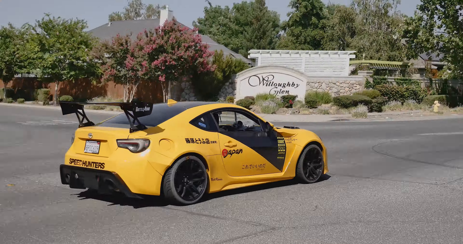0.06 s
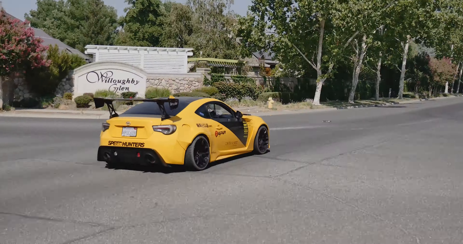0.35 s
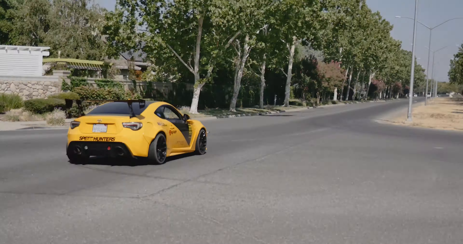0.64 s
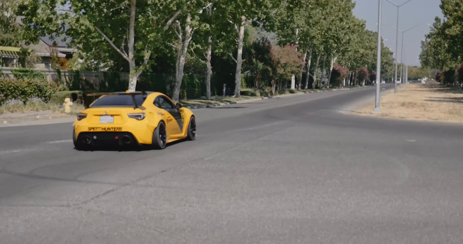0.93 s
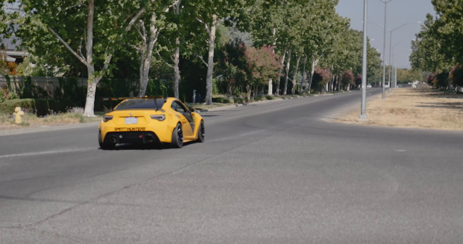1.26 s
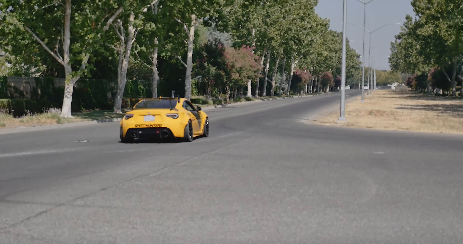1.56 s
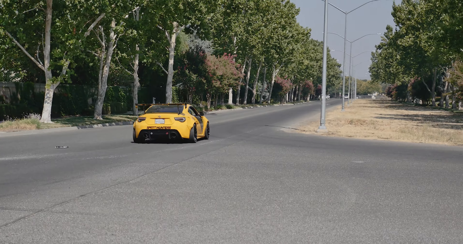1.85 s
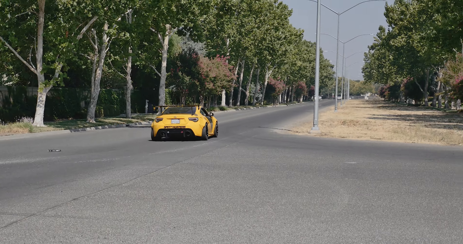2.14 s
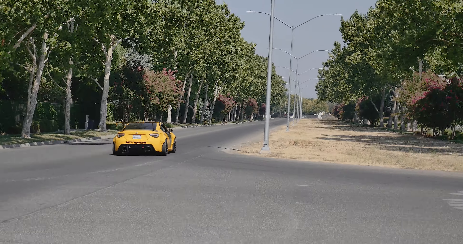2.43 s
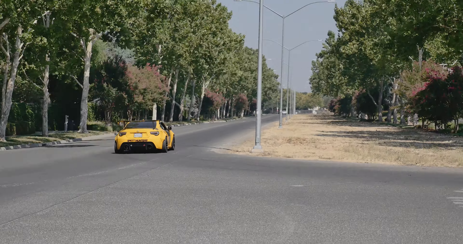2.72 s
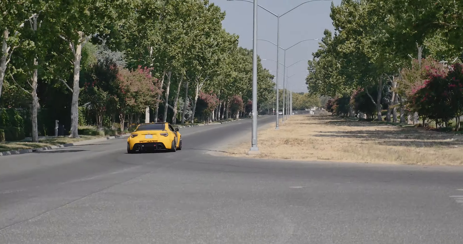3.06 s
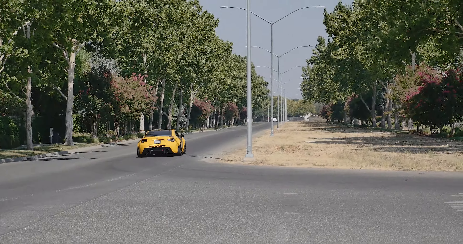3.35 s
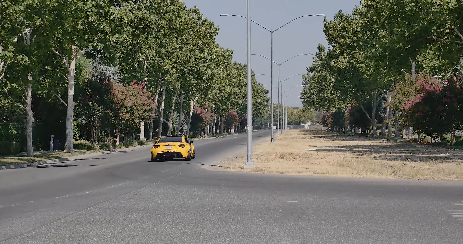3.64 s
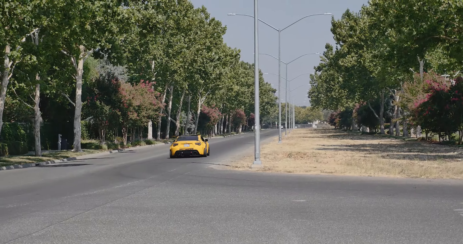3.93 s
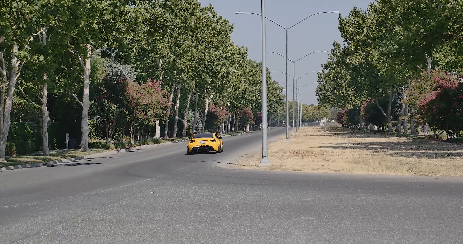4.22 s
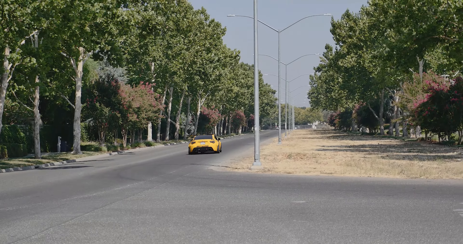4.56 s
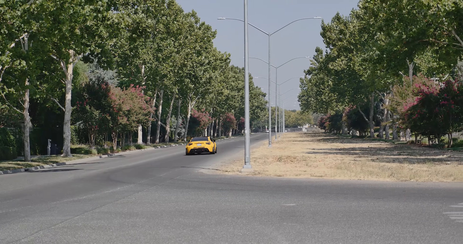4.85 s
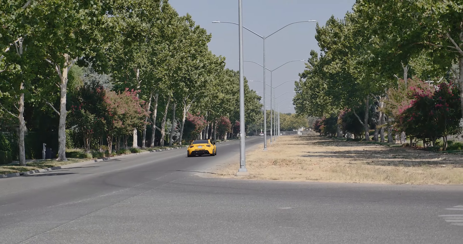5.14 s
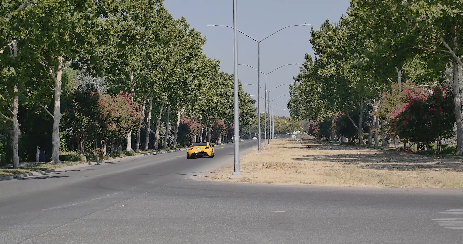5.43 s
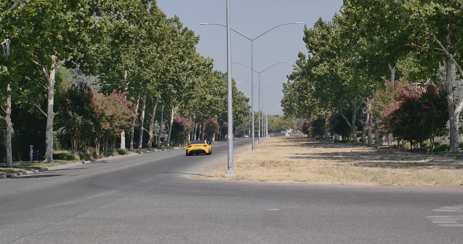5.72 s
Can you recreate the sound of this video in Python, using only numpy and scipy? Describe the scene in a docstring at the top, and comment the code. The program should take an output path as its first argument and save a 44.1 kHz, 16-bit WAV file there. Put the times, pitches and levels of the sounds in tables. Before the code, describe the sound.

A sports car burbles with sharp exhaust bangs, accelerates away with a rising rasp, then lifts off and pops again farther away.

```python
"""Flat-four sports car driving away

A tuned engine recedes down a tree-lined road, its tailpipes facing the listener. Unequal headers space
the exhaust pulses unevenly, so it coasts with a lumpy burble while unburnt fuel bangs in the hot pipe.
It pulls hard for two seconds with a turbulent rasp, lifts off and pops again farther away. The tyres
roll, the street echoes, and the loud low notes and the bangs overload a limiter."""
import sys
import numpy as np
from scipy import signal
from scipy.fft import rfft, irfft
from scipy.io import wavfile
from scipy.ndimage import uniform_filter1d

SR = 44100
rng = np.random.default_rng(int(sys.argv[2]) if len(sys.argv) > 2 else 0)


def generate_wav(signal):
    """Clip the signal to [-1, 1] and save it as 16-bit WAV at the path in sys.argv[1]."""
    frames = np.transpose(np.atleast_2d(signal))
    scaled = np.clip(frames, -1, 1) * 32767
    pcm = np.round(scaled).astype(np.int16)
    wavfile.write(sys.argv[1], SR, pcm)


N = 259308
TIME = np.arange(N) / SR

# spectrum of tyres on asphalt and open air: f/Hz, level/dB
TYRE_SPECTRUM = [(25, -3.5), (60, 12), (150, 10), (350, 5), (700, -8.5), (1050, -4), (1600, -11),
                 (2500, -24), (3300, -29), (4500, -31.5), (6000, -48), (9000, -52.5), (16000, -65.5)]
# reverberation time of the street: f/Hz, T60/s
STREET_DECAY = [(100, 0.68), (600, 0.61), (1700, 0.32), (5000, 0.075), (14000, 0.24)]
# afterfire: t/s, thump level/dB, crack level/dB, pipe ring f/Hz
BANGS = [(0.054, -1.5, -2, 590), (.426, 5, 3.5, 456), (0.4336, 2.5, -8.5, 580), (0.4793, -3, -29, 537),
         (.508, -9, -22.5, 566), (0.5587, -6, -12, 438), (.569, 3, 2.5, 629), (.589, -6, -14.5, 567),
         (.926, 0.5, -12, 694), (0.9804, -5, -9, 711), (1.1, -20.5, -38, 720), (1.329, -13, -10, 254.5),
         (1.3445, -9, 1, 830), (1.443, -20, -30.5, 255), (2.112, -19, -49, 540), (2.151, -26, -47, 538),
         (2.38, -19.5, -52, 590), (4.62, -24.5, -48, 576), (4.6508, -9.5, -44, 248), (4.701, -21, -58, 580),
         (5.141, -21.5, -50.5, 666), (5.157, -14.5, -41, 399), (5.205, -20.5, -46, 644),
         (5.711, -5.5, -19.5, 503), (5.781, -12.5, -22.5, 553)]
# spectra of a bang leaving the pipe and of its crack: f/Hz, level/dB
THUMP_SPECTRUM = [(30, -25.5), (70, 6), (130, 13), (250, 7), (450, 0), (700, 2.5), (1000, -29.5),
                  (1600, -22.5), (3000, -74.5), (8000, -67.5)]
CRACK_SPECTRUM = [(200, 8.5), (700, 13.5), (1250, 4), (1850, 2), (2300, -2.5), (2800, -6.5), (3400, -10),
                  (4700, -6), (6300, -17), (8000, -16), (11000, -30), (16000, -36)]
# modes of the pipe ring: frequency ratio, level/dB
RING_MODES = [(0.761, -21), (1, -1.5), (1.4, -20), (2.2, -22), (3.2, -28.5)]
# firing rate before the driveline shudder is added: t/s, f/Hz
FIRING_RATE = [(0, 120.6), (.15, 115), (.4, 113.8), (1, 107.5), (1.5, 104.2), (2.33, 97.22), (2.62, 104.4),
               (3.05, 113.7), (3.6, 125.6), (3.9, 131.7), (4.12, 138), (4.5, 135.6), (4.9, 136.5),
               (5.45, 131), (5.88, 124.1)]
# pedal presses: pressed t/s, lifted t/s, throttle (0-1), boom level/dB, bark level/dB
PRESSES = [(-.3, 0.389, 0.03, -11, -23), (2.356, 4.193, 0.88, -12.5, -22)]
# the pipe's low boom and the bark above it while coasting: t/s, boom level/dB, bark level/dB
COASTING_LEVELS = [(.5, -12.5, -35), (.64, -16.5, -45), (.78, -11.5, -30), (1.46, -14.5, -53.5),
                   (1.56, -19, -56), (1.68, -15, -38), (1.85, -19.5, -45), (2.04, -13, -33.5),
                   (2.26, -14.5, -35), (2.32, -20.5, -44), (4.4, -24, -40), (4.56, -18, -34),
                   (4.9, -24, -37.5), (5.06, -20.5, -35.5), (5.13, -17.5, -24), (5.24, -20, -34),
                   (5.5, -19, -30.5), (5.88, -19, -34.5)]
# unequal headers, in firing order: delay/firing intervals, level/dB with throttle shut; the same, open
HEADERS = [(0.11, 7, -0.0433, 5), (-0.053, 6, -0.071, -1), (-0.14, 5, 0.15, 0.5), (.1, 3.5, .07, 0.1)]
# spectrum of the turbulent jet at the tailpipe: f/Hz, level/dB
JET_SPECTRUM = [(300, -12), (700, -11.5), (1100, -1.5), (1650, 6), (2500, -5.5), (3300, -9), (4600, -10),
                (6000, -19), (9000, -27.5), (12000, -36), (16000, -39)]
# spectra of one firing, throttle shut and open: f/Hz, level/dB
SHUT_SPECTRUM = [(25, -36), (55, -16.5), (80, -3), (108, 3), (135, 0.5), (165, -1), (205, -12.5), (250, -9),
                 (320, -19), (430, -22.5), (560, -14.5), (700, -25.5), (850, -39), (2000, -86)]
OPEN_SPECTRUM = [(25, -15.5), (60, -7.5), (90, -1), (120, 6), (170, 2), (240, 1), (310, -2), (390, -3.5),
                 (460, -6.5), (540, 0.5), (700, -0.5), (830, -21.5), (1030, -30), (1700, -23), (3500, -53)]
# limiter characteristic: recent level/dB, ceiling/dB
LIMITER_CURVE = [(-17, -2), (-14.6, -5.5), (-12.6, -8.8)]

START_M, SPEED_M_PER_S = 4, 7.5
LOW_REVS_HZ = 100  # reference firing rate for lope, rasp and rush


def amp(db):
    """Amplitude ratio of a level in decibels."""
    return 10 ** (np.asarray(db) / 20)


def curves(rows):
    """Linear interpolation of each column of a timed table at every sample."""
    s, *columns = np.transpose(rows)
    return [np.interp(TIME, s, column) for column in columns]


def read(spectrum, hz):
    """Interpolation of a table on a logarithmic frequency axis."""
    f, value = np.transpose(spectrum)
    return np.interp(np.log(hz + 1), np.log(f), value)


def add(mix, s, sound):
    """Superposition of a sound starting at time s."""
    part = mix[max(round(s * SR), 0):][:len(sound)]
    part += sound[:len(part)]


def colour(x, spectrum, size=8192):
    """Minimum-phase filter with the given spectrum, rolling off beyond its ends."""
    hz = abs(np.fft.fftfreq(size, 1 / SR)) + 1
    rolloff = np.minimum(hz / spectrum[0][0], 1) * np.minimum(spectrum[-1][0] / hz, 1) ** 2
    log_gain = np.log(amp(read(spectrum, hz)) * rolloff)
    response = np.fft.ifft(np.exp(np.conj(signal.hilbert(log_gain)))).real[:size // 2]
    return signal.oaconvolve(x, response)[:len(x)]


def band(x, lo_hz, hi_hz):
    """Zero-phase band-pass filter."""
    hz = np.fft.rfftfreq(N, 1 / SR) + 1e-3
    return irfft(rfft(x) / (1 + (lo_hz / hz) ** 12) / (1 + (hz / hi_hz) ** 12), N)


def rms(x, size=3000):
    """Running root mean square over a few engine cycles."""
    return np.sqrt(abs(uniform_filter1d(uniform_filter1d(x ** 2, size), size)) + 1e-14)


def impulses(s, strength):
    """Fractional delay: each impulse is shared between two neighbouring samples."""
    whole, part = np.divmod(np.clip(s * SR, 0, N - 2), 1)
    whole = whole.astype(int)
    return np.bincount(whole, strength * (1 - part), N) + np.bincount(whole + 1, strength * part, N)


def distance(s):
    """Uniform motion: metres from car to listener at time s."""
    return START_M + SPEED_M_PER_S * s


def distance_db(db_per_doubling):
    """Power law of distance: the level changes by an equal step with each doubling."""
    return db_per_doubling * np.log2(distance(TIME) / START_M)


def tyres(near_db=-31.5):
    """Rolling noise: a broad spectrum attenuated with distance."""
    roll = colour(rng.standard_normal(N), TYRE_SPECTRUM)
    return amp(near_db + distance_db(-1.5)) * roll / roll.std()


def street_reverb(x, rise_s=0.16):
    """Diffuse reflection from trees and walls; the treble decays first."""
    hz, t, noise = signal.stft(rng.standard_normal(SR // 2), SR, nperseg=256)
    decay = amp(-60 * t / read(STREET_DECAY, hz)[:, None])
    tail = signal.istft(noise * decay * (1 - np.exp(-t / rise_s)), SR, nperseg=256)[1]
    wet = signal.oaconvolve(band(x, 230, 16000), tail / np.linalg.norm(tail))[:N]
    return wet * amp(np.interp(TIME, [1.5, 5.5], [-28, -20]))


def roadside_echo(x, delay_s=0.017, smear_s=0.0015, size=1500):
    """Scattering at the roadside: a ragged echo gains on the direct sound as the car recedes."""
    scatter = rng.standard_normal(size) * np.exp(-np.arange(size) / (smear_s * SR))
    echo = np.zeros(N)
    add(echo, delay_s, signal.oaconvolve(band(x, 550, 9000), scatter / np.linalg.norm(scatter)))
    return echo * amp(np.interp(TIME, [1.5, 5.5], [-22, -2]))


def open_end(x, turn_hz=110):
    """Phase inversion of the lowest notes at the pipe mouth: suction follows each pressure spike."""
    pole = np.exp(-2 * np.pi * turn_hz / SR)
    return signal.lfilter([pole, -1], [1, -pole], x)


def afterfire(crack_s=0.0012, sizzle_s=0.0098, sizzle_db=-18, tip_hz=4600, tip_s=0.00049, size=6000):
    """Impulsive excitation: fuel explodes in the hot pipe with a thump, a hollow ring and a crack."""
    t = np.arange(size) / SR
    thump = open_end(colour(signal.unit_impulse(size), THUMP_SPECTRUM))
    thump /= abs(thump).max()
    bangs = np.zeros(N)
    for s, thump_db, crack_db, ring_hz in BANGS:
        ring_s = 0.0039 + 0.00009 * distance(s)  # the ring is drawn out with distance
        modes = sum(amp(db) * np.sin(2 * np.pi * ring_hz * ratio * t) for ratio, db in RING_MODES)
        ring = np.exp(-t / ring_s) * modes
        flame = np.exp(-t / crack_s) + amp(sizzle_db) * np.exp(-t / sizzle_s)
        crack = colour(flame * rng.standard_normal(size), CRACK_SPECTRUM)
        # the steepest shock fronts also ring across the mouth of the tailpipe
        crack += amp(crack_db) * np.exp(-t / tip_s) * np.sin(2 * np.pi * tip_hz * t)
        add(bangs, s, amp(thump_db) * (thump + ring) + amp(crack_db) * crack)
    return bangs


def pedal(pressed_s, lifted_s, attack_s=0.068, release_s=0.16):
    """Trapezoidal envelope of one press of the pedal."""
    return np.interp(TIME, [pressed_s, pressed_s + attack_s, lifted_s, lifted_s + release_s], [0, 1, 1, 0])


def shudder(hz=3.5, decay_s=0.3, lag_s=0.019):
    """Damped oscillation of the driveline, wound up by each press in proportion to the throttle."""
    swing = np.zeros(N)
    for pressed_s, _, opening, *_ in PRESSES:
        t = np.maximum(TIME - pressed_s - lag_s, 0)
        swing += opening * np.exp(-t / decay_s) * np.sin(2 * np.pi * hz * t)
    return swing


def engine_load(hz, coasting_rush_db=-10.5):
    """Load sets the timbre: each press moves throttle, lope, boom, bark and rush to loaded values."""
    coasted_s = np.zeros(N)
    for _, lifted_s, *_ in PRESSES:
        coasted_s = np.where(TIME > lifted_s, TIME - lifted_s, coasted_s)
    # lope scales the unevenness of the cylinders
    coasting_lope = 0.7 + 0.37 * coasted_s
    loaded_lope = 0.714 * (LOW_REVS_HZ / hz) ** 1.71
    loaded_rush_db = -40 + 0.84 * (hz - LOW_REVS_HZ)  # the puffs merge as the revs rise
    state = [np.zeros(N), coasting_lope, *curves(COASTING_LEVELS), coasting_rush_db]
    for pressed_s, lifted_s, opening, boom_db, bark_db in PRESSES:
        down = pedal(pressed_s, lifted_s)
        loaded = [opening, loaded_lope, boom_db, bark_db, loaded_rush_db]
        state = [now + down * (target - now) for now, target in zip(state, loaded)]
    return state


def firings(hz, throttle, lope, start_phase=0.4, jitter=0.02, burn_spread_db=2.42):
    """Cyclic variation: pulse times and strengths scatter most with the throttle shut."""
    phase = np.cumsum(hz) / SR + start_phase  # in firing intervals
    count = np.arange(int(phase[-1]))
    at = np.searchsorted(phase, count)
    shut, wide = np.split(np.array(HEADERS)[count % len(HEADERS)].T, 2)
    delay, strength_db = lope[at] * (shut + throttle[at] * (wide - shut))
    slip, burn = rng.standard_normal((1000, 2))[:len(count)].T
    unsteadiness = 1 - 0.69 * throttle[at]
    s = np.interp(count + delay + jitter * unsteadiness * slip, phase, TIME)
    return s, amp(strength_db + burn_spread_db * unsteadiness * burn)


def stumble(delay_s=0.034, width_s=0.0097):
    """Interrupted flow: with the pedal up, the pipe is left empty for a moment after each big bang."""
    flow = np.ones(N)
    coasting = 1 - sum(pedal(*press[:2]) for press in PRESSES)
    for s, thump_db, *_ in BANGS:
        gap = np.exp(-((TIME - s - delay_s) / width_s) ** 2)
        flow *= 1 - coasting * min(amp(thump_db), 1) * gap
    return flow


def rasp_level(hz, throttle, near_db=-40.5, torque_peak_hz=118.2, torque_width_hz=6.4):
    """Jet noise level in dB: it grows with load and revs, swells at peak torque and falls with range."""
    torque_db = 3.5 * np.exp(-((hz - torque_peak_hz) / torque_width_hz) ** 2)
    load_db = throttle * (18 + 0.27 * (hz - LOW_REVS_HZ) + torque_db)
    # fuel left in the pipe makes the rasp flare just after a press
    flare_db = sum(10 * np.exp(-((TIME - pressed_s - 0.12) / 0.018) ** 2) for pressed_s, *_ in PRESSES)
    return near_db + load_db + flare_db + distance_db(-8)


def gas_jet(s, strength, throttle, rasp_db, rush_db, puff_s=0.00045, shock_to_puff=4.2):
    """Nonlinear steepening: under load each pulse forms a shock, then a turbulent puff over the rush."""
    scatter_db = rng.uniform(-4.5, 4.5, N)[:len(s)]
    spits = impulses(s, strength ** 0.99 * amp(scatter_db)) * (0.016 + 0.44 * throttle)
    puffs = signal.lfilter([1], [1, -np.exp(-1 / (puff_s * SR))], spits)
    turbulence = (puffs + amp(rush_db)) * rng.standard_normal(N)
    rasp = colour(shock_to_puff * throttle * spits + turbulence, JET_SPECTRUM)
    return amp(rasp_db) * rasp / rms(band(rasp, 1487, 8000))


def exhaust_pipe(s, strength, throttle, boom_db, bark_db, body_hz=175, bark_hz=380):
    """Forced resonance: the pulses ring the exhaust, and an open throttle fills in the overtones."""
    def resonate(sizes):
        pulses = impulses(s, sizes)
        shut, wide = colour(pulses, SHUT_SPECTRUM), colour(pulses, OPEN_SPECTRUM)
        return open_end((1 - throttle) * shut + throttle * wide)

    note = resonate(strength)
    # close by, the firing note covers its second harmonic, the body, which emerges with distance
    body_db = -7.5 + distance_db(3)
    boom = band(note, 0, body_hz) + amp(body_db) * band(note, body_hz, bark_hz)
    # with the throttle shut only strong pulses bark
    contrast = 1 + 0.77 * (1 - np.interp(s, TIME, throttle))
    bark = band(resonate(strength ** contrast), bark_hz, SR)
    return amp(boom_db) * boom / rms(boom) + amp(bark_db) * bark / rms(bark)


def engine(hz_per_swing=8.2, boom_db_per_swing=4):
    """Common excitation: one pulse train drives pipe and jet; shudder modulates its rate and the boom."""
    swing = shudder()
    hz = curves(FIRING_RATE)[0] + hz_per_swing * swing
    throttle, lope, boom_db, bark_db, rush_db = engine_load(hz)
    s, strength = firings(hz, throttle, lope)
    note = exhaust_pipe(s, strength, throttle, boom_db + boom_db_per_swing * swing, bark_db)
    rasp = gas_jet(s, strength, throttle, rasp_level(hz, throttle), rush_db)
    return stumble() * note + rasp


def scene():
    """Superposition of the car's direct sound and its reflections at one point."""
    bangs = afterfire()
    car = engine() + bangs
    return (car + roadside_echo(bangs) + street_reverb(car) + tyres())[None]


def record(dry, memory_s=0.12, low_hz=4, high_hz=16600):
    """Saturation: peaks flatten at a ceiling that sinks under sustained loudness; band limits follow."""
    power = np.minimum(dry[0] ** 2, 0.15)
    pole = np.exp(-1 / (memory_s * SR))
    recent_power = signal.lfilter([1 - pole], [1, -pole], power, zi=[power[:SR // 10].mean()])[0]
    ceiling = amp(np.interp(10 * np.log10(recent_power + 1e-12), *np.transpose(LIMITER_CURVE)))
    limited = dry / (1 + abs(dry / ceiling) ** 16) ** (1 / 16)
    centred = signal.lfilter(*signal.butter(1, low_hz, "high", fs=SR), limited)
    lowpass = signal.firwin(511, high_hz, window=("kaiser", 9), fs=SR)
    return signal.oaconvolve(centred, lowpass[None], "same")


dry = scene()
out = record(dry)
generate_wav(out)
```